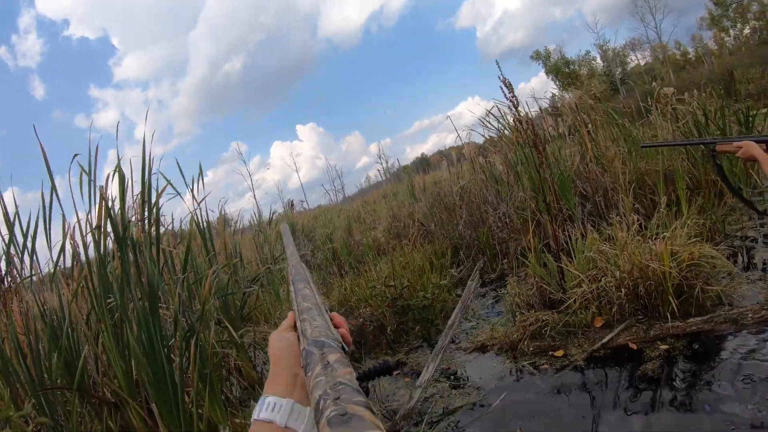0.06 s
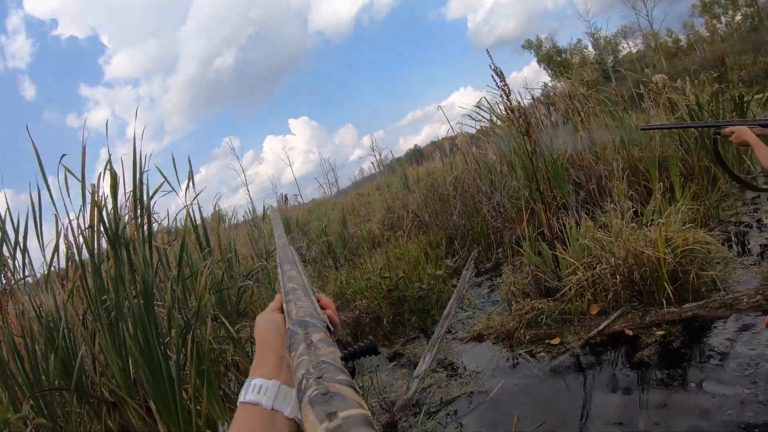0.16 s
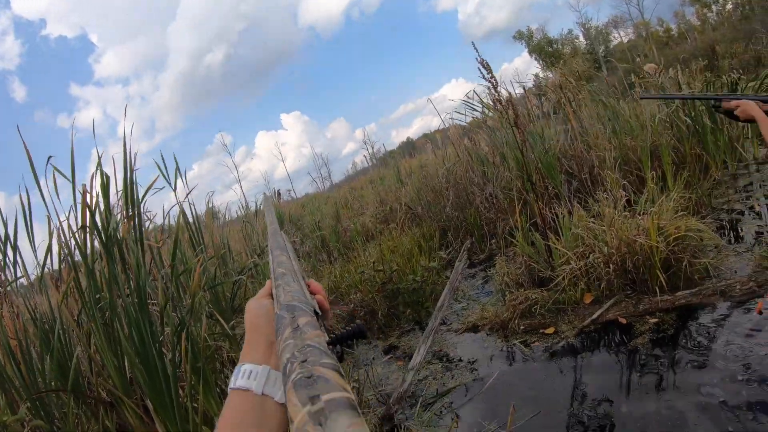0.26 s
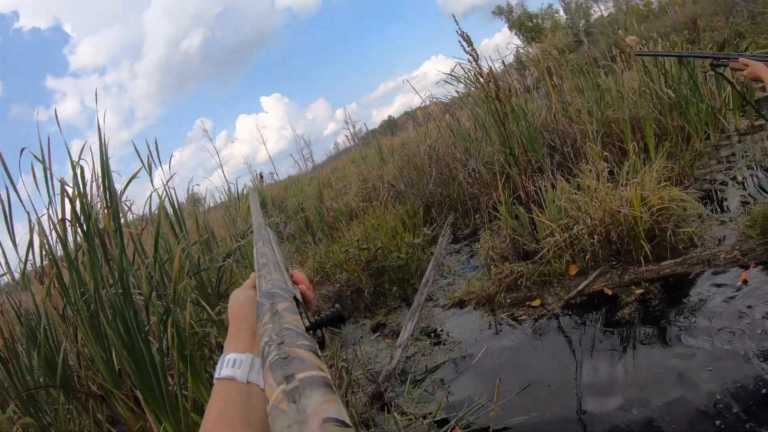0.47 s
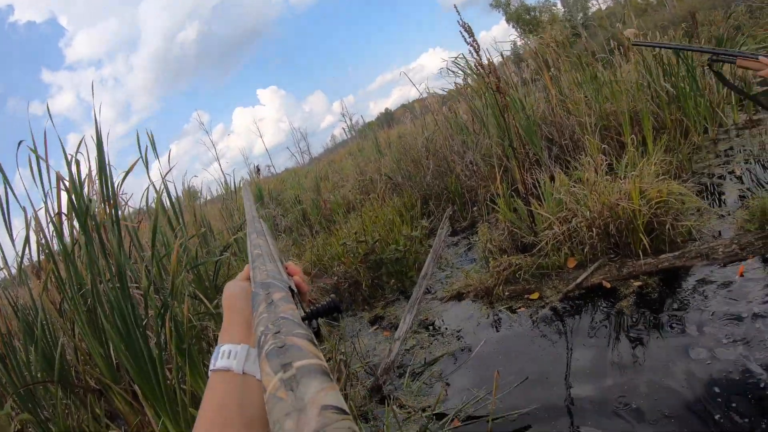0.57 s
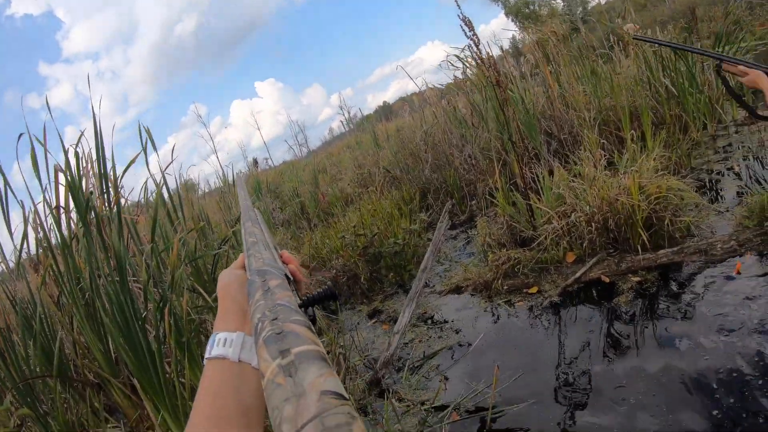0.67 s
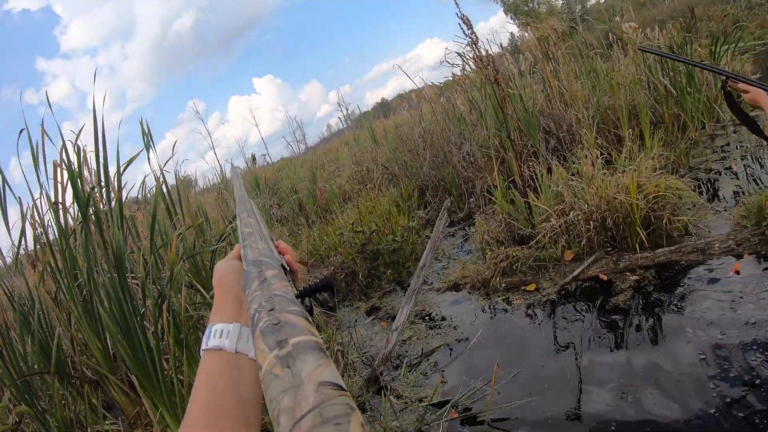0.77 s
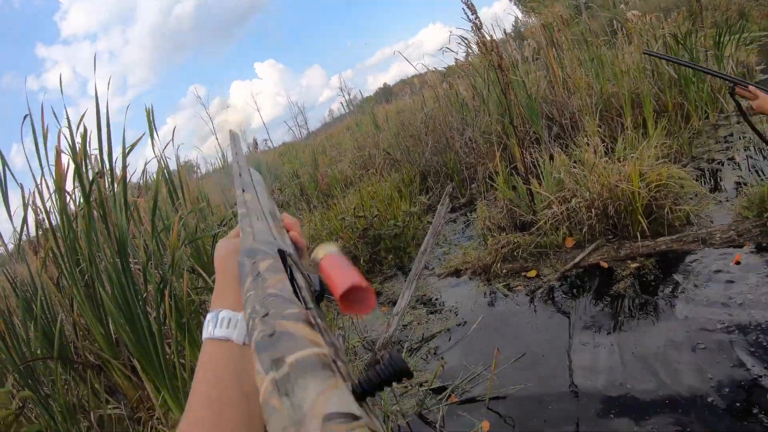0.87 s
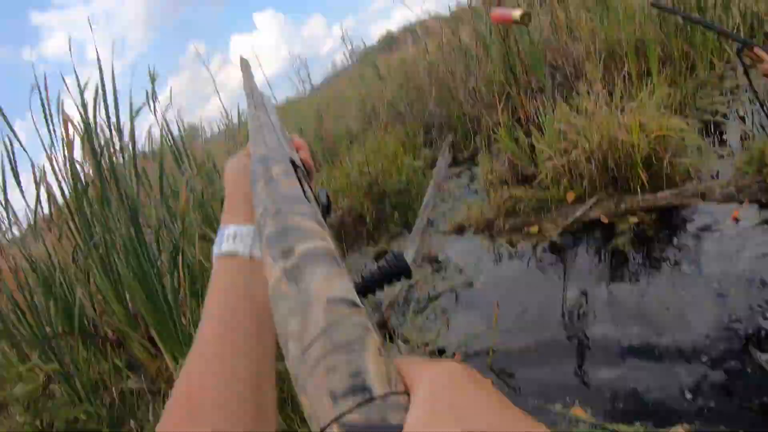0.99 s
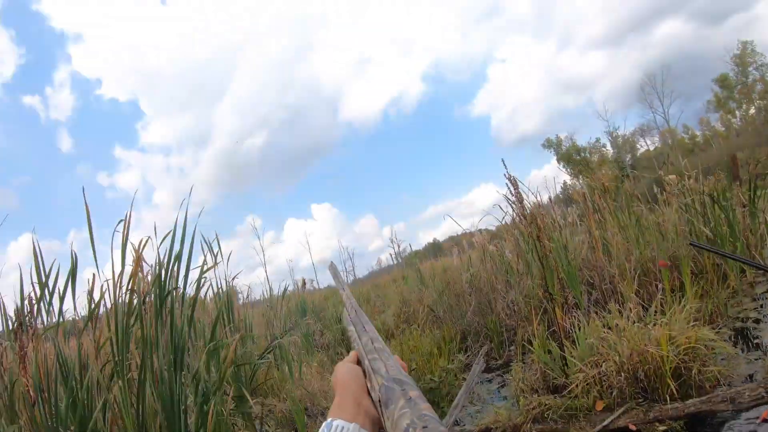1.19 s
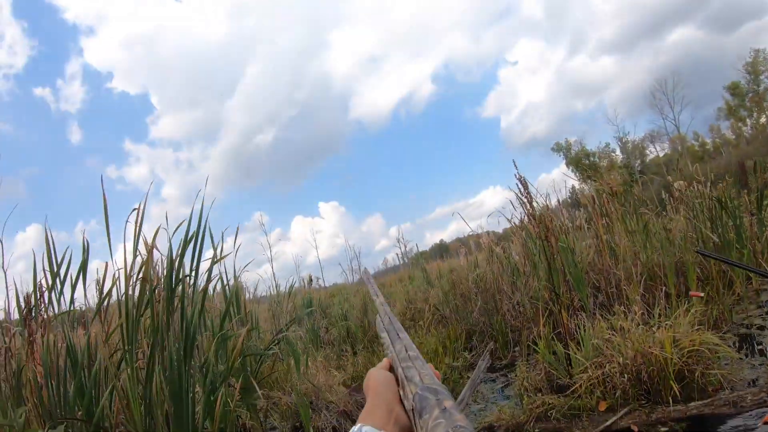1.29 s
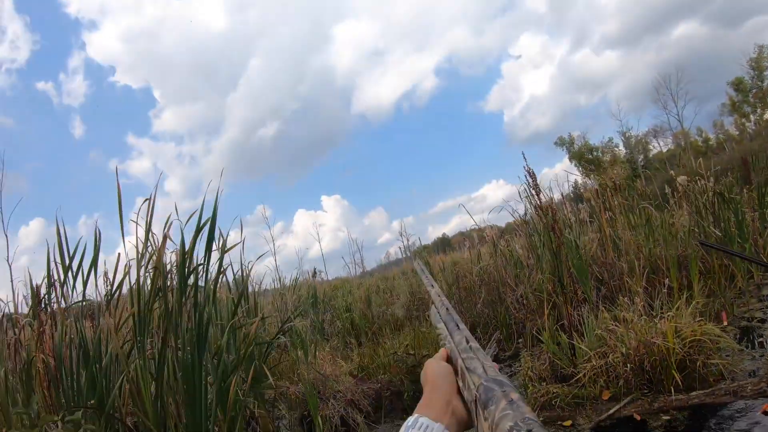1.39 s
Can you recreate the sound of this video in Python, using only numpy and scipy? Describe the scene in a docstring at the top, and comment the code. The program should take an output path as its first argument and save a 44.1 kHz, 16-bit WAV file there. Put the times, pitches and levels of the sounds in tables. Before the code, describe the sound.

Two loud shotgun blasts ring out over a marsh, heard from right beside the shooter. Between them come sharp metallic clacks as the gun reloads, and each shot leaves a low boom and a fading echo.

```python
"""Two shotgun blasts over a marsh, close to a small camera microphone that overloads on each.
Open air rumbles and something peeps faintly. The gun kicks and fires; reeds scatter the report,
a low boom rolls away and a far tree line sends it back. Close by, the steel action clacks open,
slides forward and slams shut, the stock knocks and reeds brush the shooter.
Then the second shot goes off and dies away across the marsh."""
import sys
import numpy as np
from scipy import signal
from scipy.fft import rfft, irfft
from scipy.io import wavfile
from scipy.ndimage import uniform_filter1d

SR = 44100
rng = np.random.default_rng(int(sys.argv[2]) if len(sys.argv) > 2 else 0)


def transcribe(signal):
    """Save signal, clipped to [-1, 1], as a 16-bit WAV file at the path in sys.argv[1]."""
    frames = np.atleast_2d(signal).T
    limited = np.clip(frames, -1, 1)
    pcm = np.round(limited * 32767).astype(np.int16)
    wavfile.write(sys.argv[1], SR, pcm)


N = 63945
T, HZ = np.arange(N) / SR, np.fft.rfftfreq(N, 1 / SR)
PINK = np.sqrt(SR / np.sqrt(2) / (HZ + 20))  # equal power in each octave
GUN_PAN_DB, FAR_PAN_DB, ACTION_PAN_DB = -2.5, -2, -4


def amp(db):
    """Decibels to gain."""
    return 10 ** (np.asarray(db) / 20)

def curve(points):
    """Spread (hz, value) points over every frequency."""
    hz, value = np.transpose(points)
    return np.interp(np.log(HZ + 1), np.log(hz), value)

def pan(db):
    """Channel gains for a level difference, left minus right."""
    gains = amp([[db / 2], [-db / 2]])
    return gains / np.sqrt(np.mean(gains ** 2))

def band(hz, db, octaves=1):
    """A rounded spectral hump, 8 dB down at `octaves` from its centre."""
    return [(hz * 2. ** (k * octaves), db - 8 * k ** 2) for k in range(-4, 5)]

def burst(start, decay, hold=0., rise=0.00018):
    """Attack, hold and exponential release, all in seconds."""
    return np.clip((T - start) / rise, 0, 1) * np.exp(-np.maximum(T - start - hold, 0) / decay)

def sine(hz, start):
    """A tone that rises through zero at `start`."""
    return np.sin(2 * np.pi * hz * (T - start))

# How alike the two channels are for close and for distant sources: freq_hz, correlation
NEAR_LIKENESS = [(150, 1), (700, 0.67), (2000, 0.41), (5000, 0.63), (10000, 0)]
FAR_LIKENESS = [(200, 1), (550, 0.98), (1650, 0.25), (5000, 0.47), (12000, 0.036)]
def noise(spectrum, likeness=NEAR_LIKENESS, grain=0., tilt=0.):
    """Stereo noise; grain clumps it into separate reflections, tilt brightens it in dB per octave."""
    flicker = uniform_filter1d(rng.standard_normal(N), size=36) * np.sqrt(36)
    clumps = np.exp(grain * np.clip(flicker, -2, 2))
    left, other = rfft(rng.standard_normal((2, N)) * clumps / np.sqrt(np.mean(clumps ** 2)))
    shared = np.clip(curve(likeness), -1, 1)
    right = shared * left + np.sqrt(1 - shared ** 2) * other
    gain = amp(curve(spectrum) + tilt * np.log2((HZ + 20) / 2000)) * PINK
    return irfft(np.array([left, right]) * gain, N)

# Background of the marsh: freq_hz, level_db
AIR_SPECTRUM = [(15, -78), (40, -87), (85, -54), (150, -47.5), (240, -47.5), (420, -63), (800, -54.5),
                (1400, -57.5), (2800, -63), (6000, -70.5), (10000, -77.5), (14000, -107)]
def open_air():
    """A low rumble all around the microphone."""
    return noise(AIR_SPECTRUM, FAR_LIKENESS, grain=0.35)

def peep(centre_s=0.14, half_width_s=0.007, pitch_hz=1730, glide_hz_per_s=16000):
    """One faint rising note out on the marsh, perhaps a far bird."""
    t = T - centre_s
    note = np.sin(2 * np.pi * t * (pitch_hz + glide_hz_per_s * t / 2))
    return amp(-48.5) * note * np.exp(-(t / half_width_s) ** 2)

# Jolt of the gun: freq_hz, level_db
KICK_SPECTRUM = [(60, -36.5), (350, -41), (750, -27.5), (1400, -41), (3000, -34), (5000, -40), (8000, -49),
                 (14000, -64)]
# A brief hollow midrange ring around each shot: pitch_hz, level_db
SHOT_RING_TONES = [(420, -45), (610, -45), (705, -35.5), (793, -33.5), (888, -42)]
KICK_LEAD_S = 0.011
def kick(shot_s):
    """A faint swell of noise leads into the gun's jolt; a brief hollow ring surrounds the shot."""
    start = shot_s - KICK_LEAD_S
    faint_swell = amp(-11) * np.exp(-abs(T - start) / 0.016)
    jolt = burst(start, 0.0045, hold=KICK_LEAD_S, rise=0.0012)
    tones = sum(amp(db) * sine(hz, start) for hz, db in SHOT_RING_TONES)
    hollow_ring = tones * burst(start, 0.017, hold=KICK_LEAD_S, rise=0.0009)
    return noise(KICK_SPECTRUM) * (faint_swell + jolt) + hollow_ring

# Wind on the microphone: freq_hz, level_db
GUST_SPECTRUM = [(20, -35), (50, -33), (90, -27), (200, -35), (500, -78)]
def gust(shot_s):
    """Air from the shot buffets the microphone ports, the right one harder."""
    puff = burst(shot_s - KICK_LEAD_S, 0.029, hold=KICK_LEAD_S, rise=0.015)
    return noise(GUST_SPECTRUM, likeness=[(100, 0.064)]) * puff * pan(-9)

# First crack, muzzle blast and its bright edge, at close range: freq_hz, level_db
CRACK_SPECTRUM = [(150, -32), (700, -28), (1400, -1), (2800, -12.5), (5400, -7.5), (10000, -13),
                  (14000, -40)]
BLAST_SPECTRUM = [(100, -8), (450, -14.5), (800, -5.5), (1500, -1.5), (2200, -6), (3200, -1.5), (5000, -20),
                  (7000, -2.5), (10000, -33), (14000, -49)]
SNAP_SPECTRUM = [(5000, -37), (10000, -17), (12500, -23), (15000, -17)]
# How alike the blast is in the two channels: freq_hz, correlation
BLAST_LIKENESS = [(150, 0.87), (700, -0.031), (2000, 0.82), (5000, -0.18), (10000, -0.27)]
def muzzle_blast(start, tilt, hold, body_hz, body_db, bark_db, bark_hz, bark_hold):
    """A crack arrives first, then the blast with a bright snap, a hard bark and a short ring."""
    crack = noise(CRACK_SPECTRUM) * burst(start - 0.0023, 0.0005, hold=0.0009)
    blast = noise(BLAST_SPECTRUM, BLAST_LIKENESS, tilt=tilt) * burst(start, 0.001, hold, rise=0.000083)
    snap = noise(SNAP_SPECTRUM) * burst(start, 0.00077, hold=0.00077)
    bark = noise(band(bark_hz, bark_db, octaves=0.66)) * burst(start, 0.0026, bark_hold, rise=0.00043)
    body = -amp(body_db) * sine(body_hz, start) * burst(start, 0.00039, hold=0.00054)
    return crack + blast + snap + bark + body

def pressure_push(shot_s, db, hz, decay):
    """A bass swing of pressure reaches the microphone just behind the blast."""
    start = shot_s + 0.0011
    swing = -amp(db) * sine(hz, start) * burst(start, decay, hold=0.004, rise=0.001)
    return signal.sosfilt(signal.butter(2, 28, "highpass", fs=SR, output="sos"), swing)

# Scatter from the surrounding reed bed: freq_hz, level_db
REED_SPECTRUM = [(40, -60), (85, -40.5), (175, -23), (350, -26.5), (700, -20), (1400, -22.5), (3000, -17.5),
                 (6500, -20), (10000, -25.5), (14000, -49)]
def reed_scatter(age, db, fade_db_per_s=15):
    """Reeds scatter the report, strongly at first and then in a thinning tail."""
    spreading = (1 + age / 0.012) ** -0.96
    return noise(REED_SPECTRUM, grain=0.21) * spreading * amp(db - fade_db_per_s * age)

# The low end of the report, far out: freq_hz, level_db
BOOM_SPECTRUM = [(40, -86), (85, -33.5), (160, -21.5), (280, -19), (380, -26), (500, -38.5), (1500, -57)]
def boom(age, db, rise_s=0.0085, fade_db_per_s=34):
    """A low boom rolls away over the marsh."""
    envelope = np.minimum(age / rise_s, 1) * amp(db - fade_db_per_s * age)
    return noise(BOOM_SPECTRUM, FAR_LIKENESS, grain=0.56) * envelope

# Wash from the far trees and crackle from their twigs: freq_hz, level_db
TREE_SPECTRUM = [(60, -81), (150, -40.5), (320, -27.5), (500, -36.5), (1000, -32.5), (3200, -38.5),
                 (7000, -36), (10000, -42.5), (14000, -83)]
TWIG_SPECTRUM = [(300, -59), (1000, -67), (3200, -31.5), (7000, -53), (14000, -84)]
def tree_line(age, db, peak_s=0.22, twigs_per_s=620):
    """Far trees return the shot as a swell full of small reflections, each from its own direction."""
    early, late = np.maximum(peak_s - age, 0), np.maximum(age - peak_s, 0)
    swell = amp(-93 * early) * np.hypot(amp(-84 * late), amp(-11 - 12 * late))  # drops, then lingers
    wash = noise(TREE_SPECTRUM, FAR_LIKENESS, grain=0.16)
    arrivals = rng.random(N) < twigs_per_s / SR
    clicks = arrivals * rng.choice([-1, 1], N) * rng.uniform(.3, 1, (2, N))
    twigs = irfft(rfft(clicks / clicks.std()) * amp(curve(TWIG_SPECTRUM)) * PINK, N)
    return (wash + twigs) * swell * amp(db)

def air_absorption(sound, start, db_per_s_khz=2):
    """The longer the path to the microphone, the more treble the air takes."""
    hz, t, spectra = signal.stft(sound, SR, nperseg=256)
    loss_db = db_per_s_khz * np.outer(hz / 1000, np.maximum(t - start, 0))
    return signal.istft(spectra * amp(-loss_db), SR, nperseg=256)[1][:, :N]

# The shots; kick, body and bark are relative to level_db:
# start_s, level_db, tilt_db_per_octave, hold_s, kick_db, body_hz, body_db, push_db, push_hz,
# push_decay_s, bark_db, bark_hz, bark_hold_s, reeds_db, trees_db, boom_db
GUNSHOTS = [(0.2126, -9.5, 5, .0017, 10.5, 750, 5, -13.5, 105, 0.01, -5.5, 3100, 0.0025, 0, -2, -6),
            (0.9280, -5.5, -0.6, 0.0013, 7.5, 1260, 4, -6.5, 96, 0.003, -6, 3140, 0.0053, -1, -4, -10)]
def gunshot(start, db, tilt, hold, kick_db, body_hz, body_db, push_db, push_hz, push_decay,
            bark_db, bark_hz, bark_hold, reeds_db, trees_db, boom_db):
    """The gun fires beside the microphone and the marsh answers from farther off."""
    gun = amp(kick_db) * kick(start)
    gun += muzzle_blast(start, tilt, hold, body_hz, body_db, bark_db, bark_hz, bark_hold)
    age = np.maximum(T - start, 0)
    bass = gust(start) + pressure_push(start, push_db, push_hz, push_decay) + boom(age, boom_db)
    onset = np.minimum(age / 0.004, 1)
    marsh = air_absorption(onset * (reed_scatter(age, reeds_db) + tree_line(age, trees_db)), start)
    return amp(db) * gun * pan(GUN_PAN_DB) + bass + marsh * pan(FAR_PAN_DB)

# Single echoes off the bank and the trees: start_s, level_db, decay_s, centre_hz
SLAP_ECHOES = [(0.255, -26, 0.01, 900), (0.279, -20.5, 0.0028, 680), (0.388, -34, 0.021, 3360),
               (0.412, -28, 0.0048, 1180), (0.455, -35.5, 0.018, 2700), (0.96, -20, 0.0071, 3170),
               (0.978, -22, 0.0071, 1020), (1.003, -21, 0.002, 1310), (1.136, -35, 0.0041, 1320),
               (1.178, -24, 0.0043, 1980), (1.222, -28, 0.0024, 900), (1.323, -39, 0.033, 1146)]
def slap_echoes():
    """Distant surfaces each send back one distinct slap."""
    slaps = sum(noise(band(hz, db), FAR_LIKENESS) * burst(start, decay, rise=0.00039)
                for start, db, decay, hz in SLAP_ECHOES)
    return slaps * pan(FAR_PAN_DB)

# Dull echoes, centred between the channels: centre_s, level_db, pitch_hz, half_width_s
DULL_ECHOES = [(0.325, -31, 252.7, 0.013), (0.354, -25.5, 223, 0.0093), (0.417, -16, 299.2, 0.0025),
               (0.721, -28, 246, 0.013), (1.048, -21, 206, 0.0046), (1.141, -21.5, 350, 0.0032)]
def dull_echoes():
    """Thumps that come back with only the bass swing of the shot."""
    return sum(amp(db) * sine(hz, centre) * np.exp(-((T - centre) / half_width) ** 2)
               for centre, db, hz, half_width in DULL_ECHOES)

# Steel striking steel, and its return from the reeds: freq_hz, level_db
CONTACT_SPECTRUM = [(200, -74), (600, -66), (1200, -37), (3000, -20), (5500, -23.5), (6800, -19),
                    (9000, -29.5), (12000, -36), (13500, -60), (15000, -85)]
TAIL_SPECTRUM = [(500, -59), (1200, -51), (3200, -17.5), (7000, -19), (10500, -26), (14000, -47)]
# Modes of the action: pitch_hz, bolt_back_db, bolt_forward_db, t60_s, left_minus_right_db
STEEL_MODES = [(1268, -16.5, -27.5, 0.026, -12), (2030, -50, -35, 0.038, -17),
               (2650, -51, -21.5, 0.055, -23), (3080, -17.5, -33, 0.021, -28),
               (3087, -32, -15.5, 0.045, -17), (3420, -57, -19, 0.05, -18), (4047, -23, -23, 0.038, -25),
               (4270, -58, -23, 0.047, 23), (5000, -48, -27, 0.04, 18), (6110, -25, -36, 0.051, -15),
               (6500, -17, -40, 0.03, -3), (6920, -30, -31, 0.062, -10), (7300, -37, -27.5, 0.042, 19),
               (10600, -37, -44, 0.035, 21), (11670, -56, -34.5, 0.027, 17)]
# Impacts in the action: start_s, level_db, hold_s, decay_s, tilt_db_per_octave, forward_fraction, ring_db
ACTION_CLACKS = [(0.5603, -18, 0.0077, 0.0064, 0.5, 0.5, 8.5), (0.5722, -3, 0.0025, 0.0023, 1, 0.17, 3),
                 (0.6966, -14.5, 0.0024, 0.0026, 1.5, 0.5, 5.5),
                 (0.717, -13, 0.0014, 0.0019, 3.5, 0.67, 6.5), (0.737, -18.5, 0.003, 0.0035, 3, 0.4, 4),
                 (0.7545, -3.5, 0.00074, 0.0031, 4.5, 0.79, 6.5), (0.758, -8.5, 0.0009, 0.005, 0, 0.88, 4)]
def clack(start, db, hold, decay, tilt, forward, ring_db):
    """Close by, steel parts chatter for a few milliseconds and ring; the reeds return a short tail."""
    contact = burst(start, decay, hold)
    steel = noise(CONTACT_SPECTRUM, grain=0.51, tilt=tilt) * contact * pan(ACTION_PAN_DB)
    chatter = rng.standard_normal((2, N)) * contact
    t = T[:SR // 10]
    for hz, back_db, forward_db, t60, side_db in STEEL_MODES:
        mode = np.sin(2 * np.pi * hz * t) * amp(-60 * t / t60)
        ring = signal.oaconvolve(chatter, mode[None], axes=1)[:, :N]
        mode_db = back_db + (forward_db - back_db) * forward + ring_db + tilt * np.log2(hz / 5000)
        steel += ring / abs(ring).max(1, keepdims=True) * pan(side_db) * amp(mode_db)
    tail = noise(TAIL_SPECTRUM, FAR_LIKENESS, grain=0.098) * burst(start, 0.037, rise=0.025)
    return amp(db) * (steel + tail * amp(-15.5) * pan(ACTION_PAN_DB))

# Steel sliding on steel, close up: freq_hz, level_db
SCRAPE_SPECTRUM = [(800, -61), (2000, -66), (3200, -35.5), (7000, -35), (10000, -41.5), (14000, -66)]
def bolt_slide(centre_s=0.748, width_s=0.033):
    """The bolt scrapes forward with a fresh shell."""
    stroke = np.exp(-.5 * ((T - centre_s) / width_s) ** 2)
    return noise(SCRAPE_SPECTRUM, grain=0.55) * stroke * amp(-6.5) * pan(ACTION_PAN_DB)

# Knocks through the stock, and reeds against the shooter: start_s, level_db, decay_s, centre_hz
STOCK_KNOCKS = [(0.702, -35.5, 0.017, 207), (1.092, -38, 0.0099, 50.4)]
REED_BRUSHES = [(0.827, -42.5, 0.0091, 1230)]
def handling():
    """Near the microphone, the stock thuds softly in the hands and reeds brush the shooter."""
    return sum(noise(band(hz, db)) * burst(start, decay, hold=decay, rise=0.0054)
               for start, db, decay, hz in STOCK_KNOCKS + REED_BRUSHES)

def scene():
    """The marsh, the shots and the working of the gun, heard from beside the shooter."""
    marsh = open_air() + peep()
    shots = sum(gunshot(*row) for row in GUNSHOTS) + slap_echoes() + dull_echoes()
    action = sum(clack(*row) for row in ACTION_CLACKS) + bolt_slide()
    return marsh + shots + action + handling()

def record(dry, top_hz=16100):
    """The camera microphone rounds off the highest peaks, and the top of the treble is cut."""
    overloaded = dry / (1 + dry ** 4) ** (1 / 4)
    lowpass = signal.firwin(511, top_hz, window=("kaiser", 9), fs=SR)
    return signal.oaconvolve(overloaded, lowpass[None], "same")


dry = scene()
out = record(dry)
transcribe(out)
```